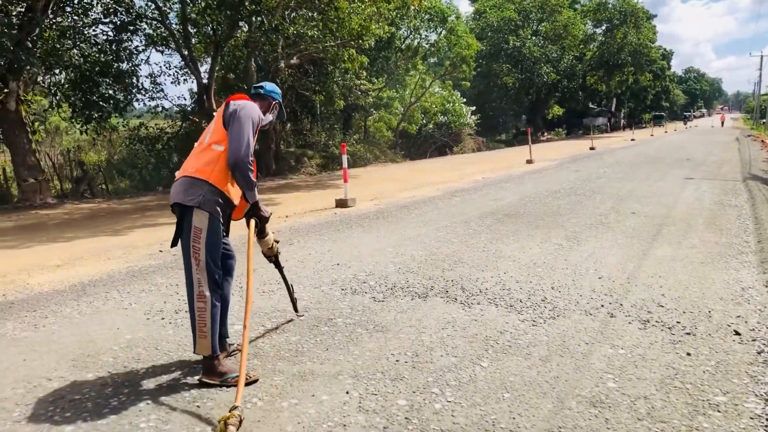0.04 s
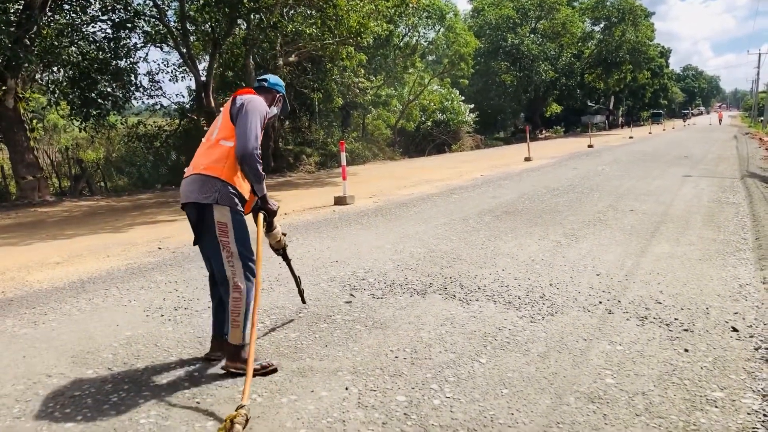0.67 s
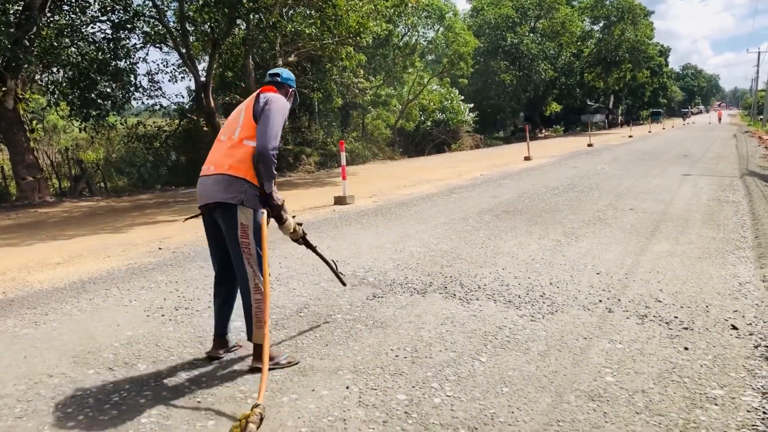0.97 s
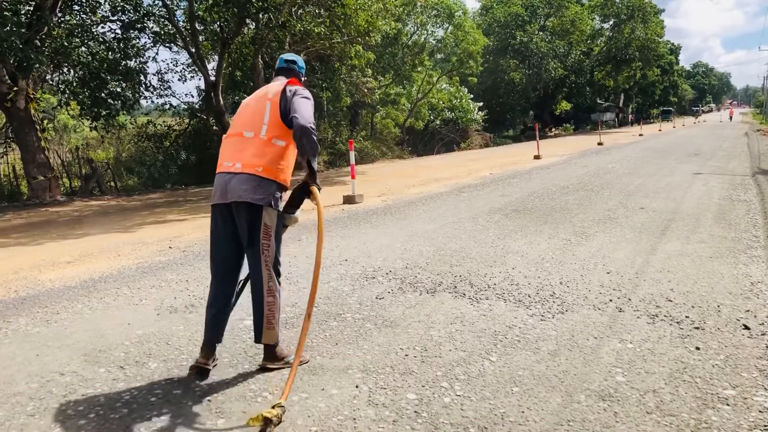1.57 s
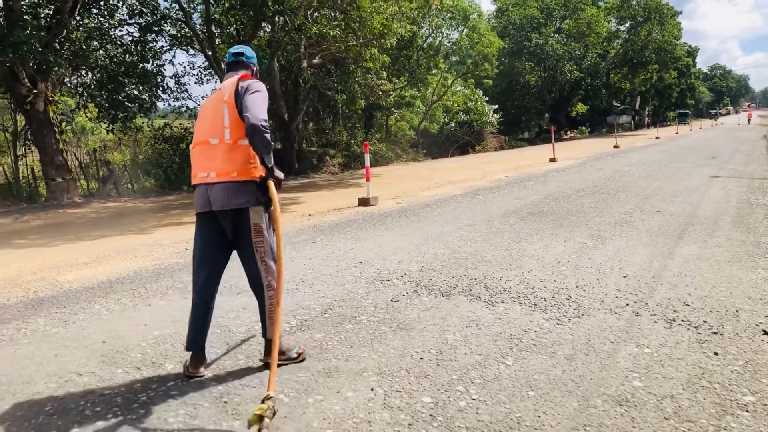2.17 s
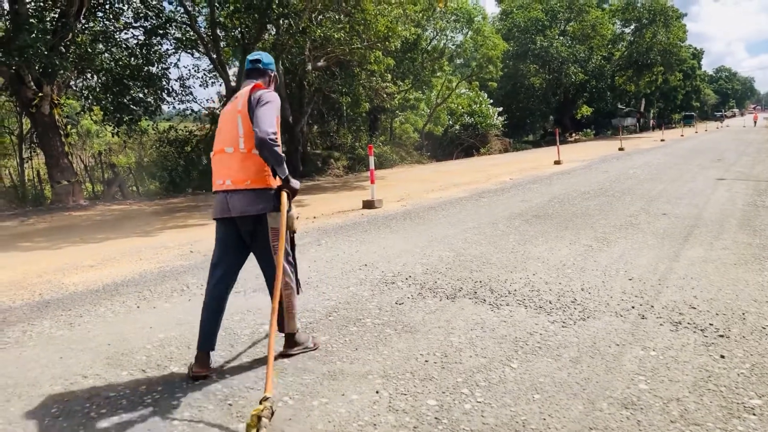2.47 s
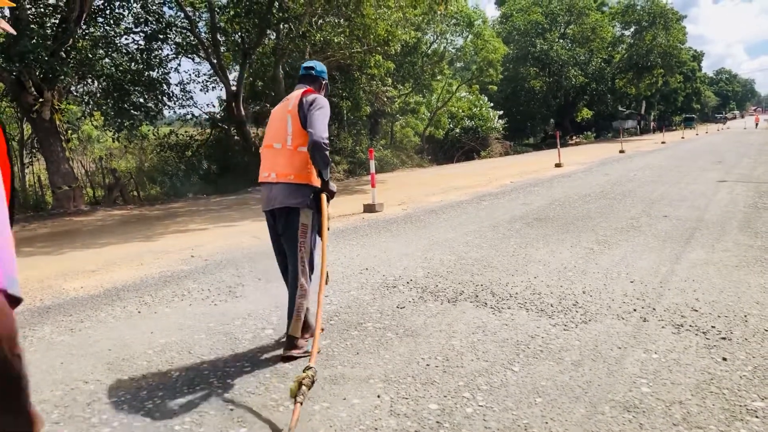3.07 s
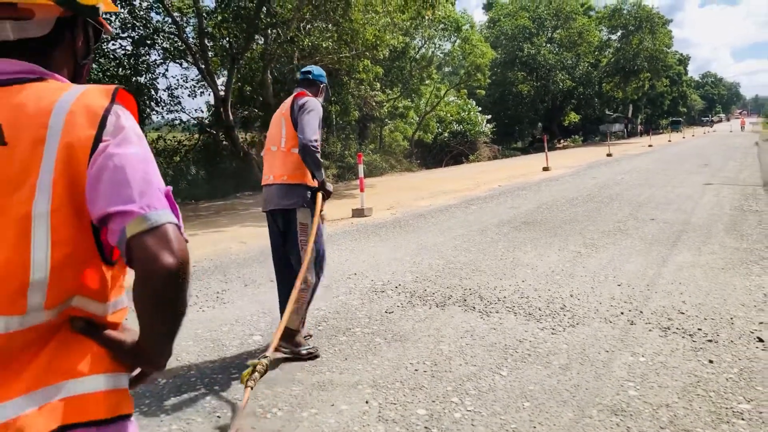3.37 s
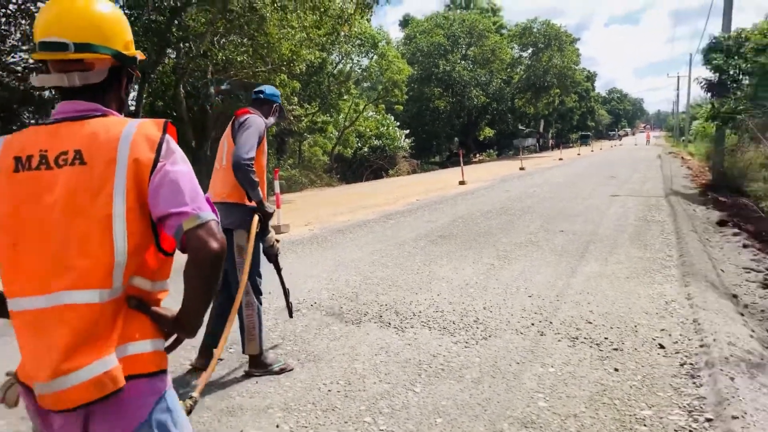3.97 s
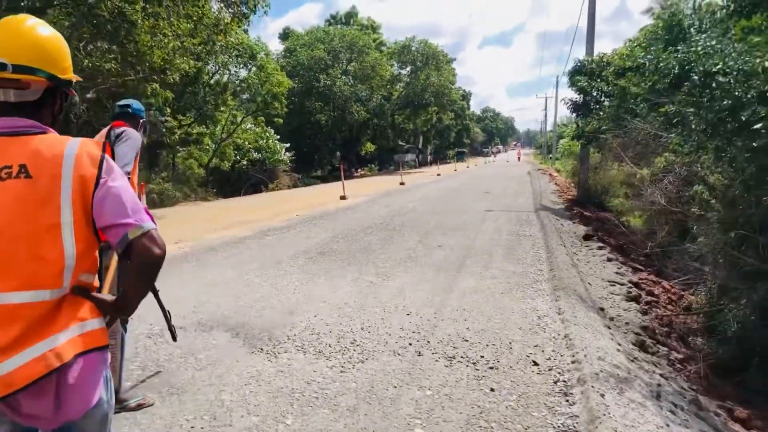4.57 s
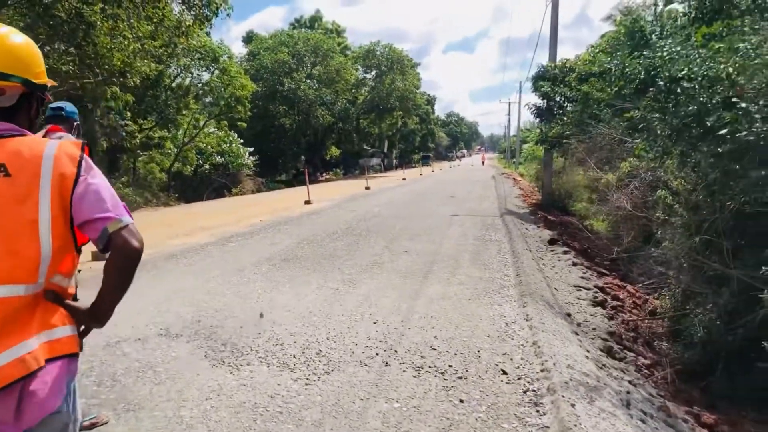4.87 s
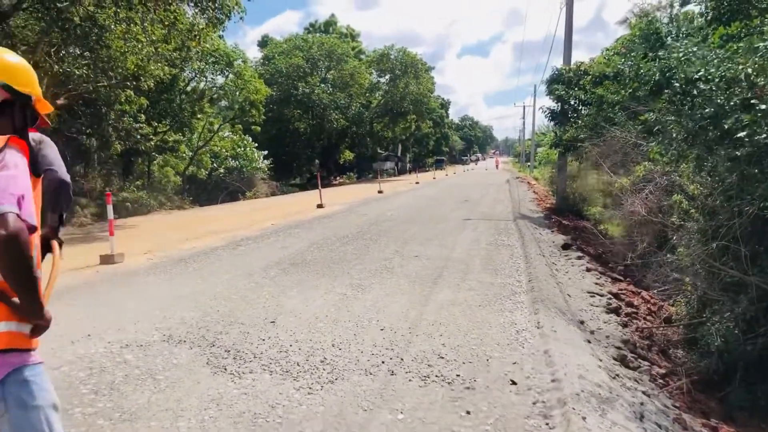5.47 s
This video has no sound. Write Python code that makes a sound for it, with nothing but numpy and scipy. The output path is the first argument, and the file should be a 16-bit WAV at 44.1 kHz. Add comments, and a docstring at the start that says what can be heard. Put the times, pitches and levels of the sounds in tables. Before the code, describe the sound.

Outdoors and close by, a truck engine and pump throb steadily under the sizzling hiss of a hand sprayer wetting a stony road. The hiss is strongest at first and wavers as the lance moves. A faint high whistle appears early, while a thin machinery squeal keeps swelling and fading. Toward the end the spray eases a little as the engine and squeal grow louder.

```python
"""A hand lance hisses as a worker sprays bitumen on a gravel road, the tanker truck running close behind.
The nozzle's bright band shifts as the lance swings; the liquid tears into a sizzling mist
and lands on the stones with a lower rush. The engine drones and beats slowly against the pump;
a thin squeal comes and goes in the machinery, with a fainter whistle early on."""
import sys
import numpy as np
from scipy import signal
from scipy.fft import rfft, irfft, next_fast_len
from scipy.io import wavfile

SR = 44100
rng = np.random.default_rng(int(sys.argv[2]) if len(sys.argv) > 2 else 0)


def unload_audio(sound):
    """Save the sound as a 16-bit wav file, at the path given as the first command line argument."""
    columns = np.transpose(np.atleast_2d(sound))
    # keep every value between -1 and 1, then stretch to whole-number steps
    steps = np.round(np.clip(columns, -1, 1) * 32767)
    wavfile.write(sys.argv[1], SR, steps.astype(np.int16))


N = 244314
TIME = np.arange(N) / SR
CUTOFF_HZ = 15700


def from_db(db):
    """Decibels to gain."""
    return 10 ** (np.asarray(db) / 20)


def unit_rms(x):
    """Scale to unit rms."""
    return x / np.sqrt(np.mean(x ** 2) + 1e-20)


def in_time(rows, times=TIME):
    """Each value column of a time table, linearly interpolated."""
    s, *columns = np.transpose(rows)
    return [np.interp(times, s, column) for column in columns]


def at_hz(spectrum, hz):
    """Spectrum level in dB, interpolated over log frequency."""
    known_hz, level_db = np.transpose(spectrum)
    return np.interp(np.log(hz), np.log(known_hz), level_db)


def drift(rate_hz, step=20):
    """Random wander of unit rms, rolled off above rate_hz."""
    size = next_fast_len(N // step + 2)
    hz = np.arange(size // 2 + 1) * SR / step / size
    spectrum = rfft(rng.standard_normal(size)) / (1 + (hz / rate_hz) ** 2)
    return np.interp(TIME, np.arange(size) * step / SR, unit_rms(irfft(spectrum, size)))


def phase_of(hz):
    """Running phase in radians of a varying frequency."""
    return 2 * np.pi * np.cumsum(hz) / SR


def swell_and_fade(start_s, length_s, attack_s, release_s):
    """Gain that rises, rounds off, holds and falls."""
    ramp = np.clip(np.minimum((TIME - start_s) / attack_s, (start_s + length_s - TIME) / release_s), 0, 1)
    return ramp * (1 + ramp * (1 - ramp))


def turbulence(colour_db, frame=2048, hop=512):
    """Steady noise of unit rms with the spectral shape colour_db(hz, s)."""
    hz, s, cells = signal.stft(rng.standard_normal(N), SR, nperseg=frame, noverlap=frame - hop)
    gain = from_db(colour_db(hz[:, None] + 1, s)) * (hz[:, None] < CUTOFF_HZ + 500)
    gain = gain / np.sqrt(np.mean(gain ** 2, axis=0))
    _, noise = signal.istft(cells * gain, SR, nperseg=frame, noverlap=frame - hop)
    return unit_rms(noise[:N])


def hum(hz=53.7, level_db=-51.5):
    """Faint steady hum below the firing tone."""
    return np.sqrt(2) * from_db(level_db) * np.sin(2 * np.pi * hz * TIME)


# Swell of the drone: (time [s], gain [dB])
DRONE_SWELL = [(0, -1.5), (.8, 0.5), (1.4, 1.5), (2.3, 0), (3.0, 4), (3.4, -0.5), (4.0, 3), (4.6, -3),
               (5.1, -1), (5.54, 1)]


def machine_pulses(orders, phase, base_hz, uneven, drone_hz=322, drone_width_hz=44):
    """Uneven strokes as a sum of harmonics; those near the drone swell with it."""
    drone_db, = in_time(DRONE_SWELL)
    pulses = 0
    for order, db in orders:
        in_drone = np.exp(-((order * base_hz - drone_hz) / drone_width_hz) ** 2)
        pulses += from_db(db + in_drone * drone_db) * np.sin(order * phase) * (1 + uneven * drift(9.3))
    return np.sqrt(2) * pulses


# Truck drawing nearer: (time [s], boom gain [dB], clatter gain [dB])
TRUCK_APPROACH = [(0, -7, -9.5), (.12, -2, -3), (1.5, -1.4, -2), (2.2, -0.5, -0.9), (3.7, 0, -0.5),
                  (4.4, 0, 2), (5.0, 1.4, 2.5), (5.54, 5, 6.5)]
# Four-cylinder exhaust, firing tone apart: (order [x cycle rate], level [dB])
EXHAUST_ORDERS = [(3, -79), (5, -56), (7, -52.5), (8, -37.5), (9, -84), (10, -72), (11, -83), (12, -54),
                  (13, -76), (14, -81), (15, -46), (16, -72), (17, -60), (19, -72), (24, -62.5),
                  (27, -63.5)]
# Pump gears: (order [x tooth rate], level [dB])
GEAR_ORDERS = [(1, -45), (2, -48)]
# Low rumble: (frequency [Hz], relative level [dB])
RUMBLE_SPECTRUM = [(25, -32), (42, -24), (54, -10), (75, -11), (110, 3), (140, -12.5), (200, 3), (280, -3),
                   (400, -5.5), (520, -17), (900, -30.5)]
# Machinery roar: (frequency [Hz], relative level [dB])
ROAR_SPECTRUM = [(300, -10), (520, -9), (700, 1), (920, 3.5), (1120, -1), (1380, -7.5), (1750, -1),
                 (2200, -12.5), (3200, -1), (4600, -2.5), (7500, 1), (12000, -18.5)]


def truck(cycle_hz=21.258, teeth_per_cycle=7.661, start_cycles=1.7, knock=0.14, roar_follows=1.33):
    """The engine drives the pump; orders about 7 Hz apart throb. The noise swells at each firing."""
    boom_db, clatter_db = in_time(TRUCK_APPROACH)
    cycle = 2 * np.pi * start_cycles + phase_of(cycle_hz * (1 + 0.00054 * drift(0.84)))
    tooth, tooth_hz = teeth_per_cycle * cycle, teeth_per_cycle * cycle_hz
    firing = np.sin(4 * cycle)
    boom = np.sqrt(2) * from_db(-28.5 + boom_db + 0.082 * drift(14)) * firing
    exhaust = from_db(0.04) * machine_pulses(EXHAUST_ORDERS, cycle, cycle_hz, uneven=0.037)
    pump = from_db(-0.9) * machine_pulses(GEAR_ORDERS, tooth, tooth_hz, uneven=0.084)
    rumble = from_db(-42.5) * turbulence(lambda hz, s: at_hz(RUMBLE_SPECTRUM, hz))
    roar = from_db(-34.5 + roar_follows * boom_db) * turbulence(lambda hz, s: at_hz(ROAR_SPECTRUM, hz))
    swell = 1 + knock * firing
    return boom + swell * roar + from_db(clatter_db) * (exhaust + pump + swell * rumble)


# Faint whistles: (start [s], length [s], level [dB])
WHISTLE_EVENTS = [(0.5, .75, -44), (1.42, .42, -41), (1.95, 0.27, -49)]


def whistle(hz=3885, waver_hz=32, fade_s=0.12, gain_db=2.2, flutter_db=3.0):
    """Thin, airy tone above the squeal, heard only early on."""
    swells = sum(from_db(db) * swell_and_fade(s, length, fade_s, fade_s)
                 for s, length, db in WHISTLE_EVENTS)
    gain = swells * from_db(gain_db + flutter_db * drift(40))
    return np.sqrt(2) * gain * np.sin(phase_of(hz + waver_hz * drift(73)))


# Machinery squeals: (start [s], length [s], level [dB], pitch [Hz])
SQUEAL_EVENTS = [(0.36, .6, -38, 2558), (1.08, .32, -45, 2569), (1.48, .39, -38.5, 2569),
                 (2.07, .15, -41, 2559), (2.21, .27, -36, 2566), (2.46, .26, -38, 2531),
                 (2.7, .25, -38, 2541), (2.92, .27, -32, 2551), (3.21, .27, -28.5, 2535),
                 (3.45, .22, -36, 2526), (3.62, .3, -29.5, 2526), (3.64, .77, -29, 2522),
                 (4.39, .38, -31, 2540), (4.77, .25, -35.5, 2550), (5.03, .3, -29, 2546),
                 (5.1, .62, -25.5, 2531)]


def squeal(gain_db=-0.95, floor_db=-46, third_db=-41, flutter_db=1.04,
           sharp_hz=6, wander_hz=2.55, waver_hz=5.47, rough_hz=18):
    """Friction tone that swells but never quite stops; a rough third harmonic grows as the truck nears."""
    _, clatter_db = in_time(TRUCK_APPROACH)
    shapes = [swell_and_fade(s, length, 0.6 * length, 0.4 * length) for s, length, _, _ in SQUEAL_EVENTS]
    swells = sum(from_db(db + gain_db) * shape for (_, _, db, _), shape in zip(SQUEAL_EVENTS, shapes))
    gain = np.hypot(swells, from_db(floor_db + clatter_db))
    hz, = in_time([(s + length / 2, pitch) for s, length, _, pitch in SQUEAL_EVENTS])
    hz += sharp_hz * (1 - sum(shapes))  # sharp at each start and end
    phase = phase_of(hz + wander_hz * drift(5.9) + waver_hz * drift(26.8))
    tone = gain * from_db(flutter_db * drift(31)) * np.sin(phase)
    third = from_db(third_db + clatter_db) * np.sin(3 * phase + phase_of(rough_hz * drift(90)))
    return np.sqrt(2) * (tone + third)


# Spray landing on the road: (time [s], level [dB])
SPLASH_LEVEL = [(0, -33.5), (.06, -28), (.2, -31.5), (.52, -27.5), (.71, -32.5), (.9, -43.5), (1.03, -42.5),
                (1.17, -36), (1.31, -31.5), (1.43, -36.5), (1.59, -34), (1.95, -42), (2.21, -37),
                (2.98, -43), (3.36, -42), (3.62, -34), (4.05, -39), (4.5, -36), (4.8, -42.5), (5.09, -42),
                (5.54, -34)]
# Splash colour, following the fan angle: (time [s], centre [Hz])
SPLASH_CENTRE = [(0, 2260), (1.15, 2150), (1.32, 1540), (1.5, 2130), (2.17, 1920), (2.6, 2250),
                 (3.65, 1730), (4.3, 2160), (5.54, 1790)]
# Splash at its usual centre: (frequency [Hz], relative level [dB])
SPLASH_SPECTRUM = [(300, -46), (600, -16), (900, -7.5), (1350, -2), (1700, 0.5), (2200, 2), (2800, 1),
                   (3400, -2.5), (5000, -5.5), (9000, -36)]


def splash(usual_hz=2146, gain_db=3.5, surge_db=0.62, patter_db=1.03):
    """Countless droplets on gravel merge into a slightly grainy rush."""
    level_db, = in_time(SPLASH_LEVEL)
    rush = turbulence(lambda hz, s: at_hz(SPLASH_SPECTRUM, hz * usual_hz / in_time(SPLASH_CENTRE, s)[0]))
    return from_db(level_db + gain_db + surge_db * drift(7.2) + patter_db * drift(150)) * rush


# Finest, highest hiss: (time [s], level [dB])
MIST_LEVEL = [(0.0, -32), (0.91, -34.5), (1.64, -32.5), (1.71, -27), (2.22, -33), (3.41, -34),
              (4.63, -28.5), (5.06, -36), (5.54, -31)]
# Finest hiss: (frequency [Hz], relative level [dB])
MIST_SPECTRUM = [(11500, -23), (13100, -7), (13800, -2), (14500, -8), (15300, -2), (16000, -7)]
# Droplet sizzle: (frequency [Hz], relative level [dB])
SIZZLE_SPECTRUM = [(8300, -20), (9600, 3.5), (10700, 2), (11800, -1), (12700, -3.5), (13400, -11),
                   (14500, -19)]


def mist(sizzle_db=-33, sizzle_follows=0.65, flicker_db=1.1):
    """The liquid sheet tears into droplets: sizzle and finest hiss, flickering as the fan turns."""
    surge_db = in_time(JET_LEVEL)[0] - JET_USUAL_DB
    sizzle_gain = from_db(sizzle_db + sizzle_follows * surge_db)
    sizzle = sizzle_gain * turbulence(lambda hz, s: at_hz(SIZZLE_SPECTRUM, hz))
    finest = from_db(in_time(MIST_LEVEL)[0]) * turbulence(lambda hz, s: at_hz(MIST_SPECTRUM, hz))
    return from_db(flicker_db * drift(5.1)) * (sizzle + finest)


# Jet as the lance swings: (time [s], level [dB])
JET_LEVEL = [(0.0, -15.5), (0.09, -15.5), (0.25, -20), (0.37, -16), (0.85, -21), (1.03, -19.5),
             (1.08, -21.5), (1.2, -19.5), (1.68, -23), (1.85, -19.5), (2.17, -22.5), (2.31, -20),
             (2.36, -21.5), (3.01, -20), (3.39, -23), (3.53, -17.5), (3.96, -17), (4.0, -18.5), (4.61, -18),
             (4.78, -23), (5.2, -25.5), (5.54, -23.5)]
JET_USUAL_DB = -20.5
# Broad hiss: (frequency [Hz], relative level [dB])
JET_SPECTRUM = [(2000, -36.5), (3200, -19.5), (3900, -15.5), (4500, -16.5), (5300, -12), (6500, -14),
                (8200, -12.5), (9500, -16.5), (11000, -38)]
# Bright peak at its usual centre: (frequency [Hz], relative level [dB])
PEAK_SPECTRUM = [(4000, -50), (4700, -17.5), (5100, -8), (5550, -2.5), (6100, 1.5), (6450, 0.5), (6900, 0),
                 (7500, -5), (8100, -10.5), (9500, -24.5)]
# Peak sliding with the lance angle: (time [s], centre [Hz])
PEAK_CENTRE = [(0.0, 6420), (0.32, 6330), (1.54, 6470), (1.71, 6800), (2.95, 6270), (3.04, 6610),
               (3.81, 6300), (4.66, 7440), (5.54, 6850)]
# Peak prominence, least when a bystander screens the nozzle: (time [s], gain [dB])
PEAK_GAIN = [(0, -2), (1.1, -2), (1.65, -4.5), (2.35, -4.5), (2.9, -1), (3.5, -4), (4.6, -6.5),
             (5.05, -6.5), (5.54, -19)]


def nozzle(usual_hz=6396, peak_follows=0.34, gain_db=0.7, wander_db=0.4, sputter_db=0.5,
           echo_gain=0.24, echo_s=0.0029, sway=0.075):
    """Broad jet hiss with a sliding bright peak; its echo off the road ripples the spectrum."""
    def colour_db(hz, s):
        surge_db = in_time(JET_LEVEL, s)[0] - JET_USUAL_DB
        peak_db = in_time(PEAK_GAIN, s)[0] + peak_follows * surge_db
        centre_hz, = in_time(PEAK_CENTRE, s)
        peak = from_db(at_hz(PEAK_SPECTRUM, hz * usual_hz / centre_hz) + peak_db)
        hiss = from_db(at_hz(JET_SPECTRUM, hz))
        lag_s = echo_s * (1 + sway * np.interp(s, TIME, drift(0.88)))
        ripple = np.abs(1 + echo_gain * np.exp(-2j * np.pi * hz * lag_s))
        return 20 * np.log10(ripple * np.hypot(peak, hiss))

    level_db = in_time(JET_LEVEL)[0] + gain_db + wander_db * drift(11) + sputter_db * drift(41)
    return from_db(level_db) * turbulence(colour_db)


def scene():
    """Open air, no reverberation, both channels alike."""
    mono = truck() + hum() + nozzle() + mist() + splash() + squeal() + whistle()
    return np.array([mono, mono])


def record(dry):
    """Steep elliptic low-pass."""
    return signal.sosfilt(signal.ellip(12, 0.1, 80, CUTOFF_HZ, fs=SR, output="sos"), dry)


dry = scene()
out = record(dry)
unload_audio(out)
```